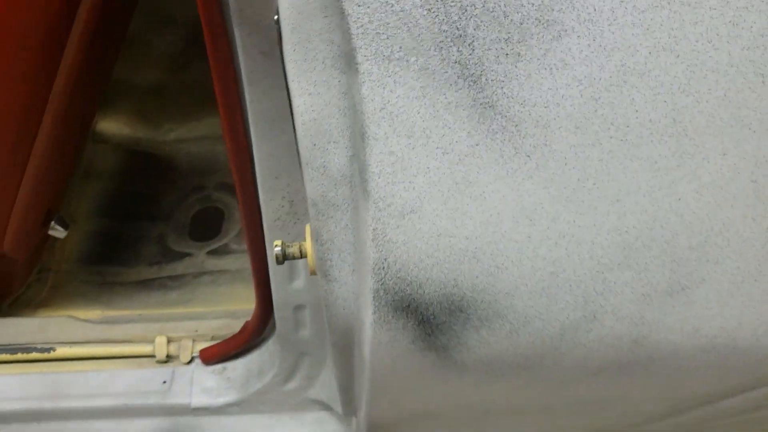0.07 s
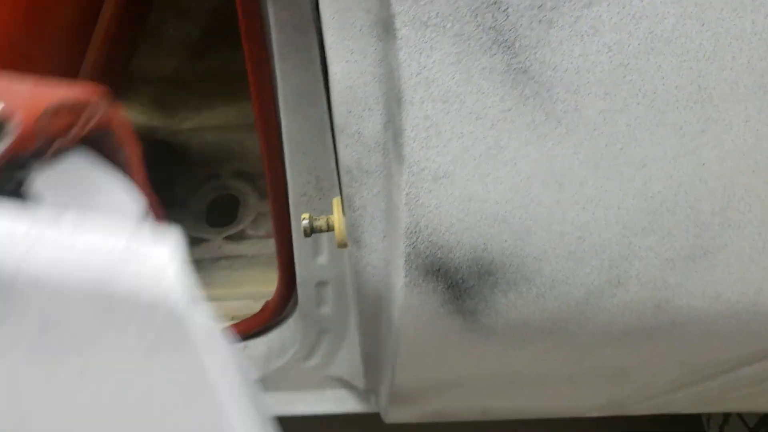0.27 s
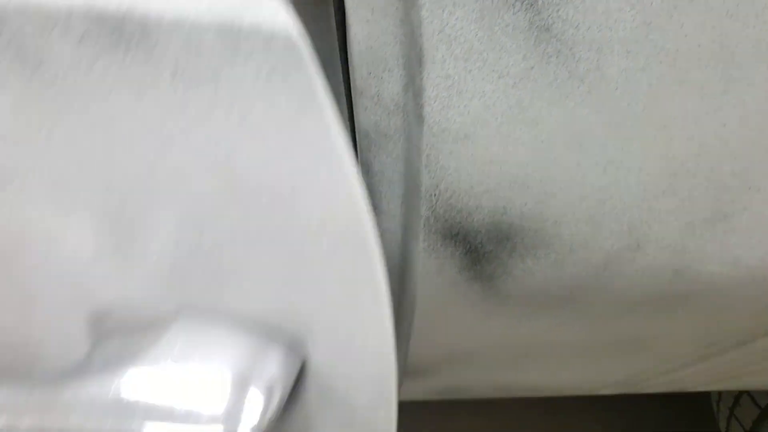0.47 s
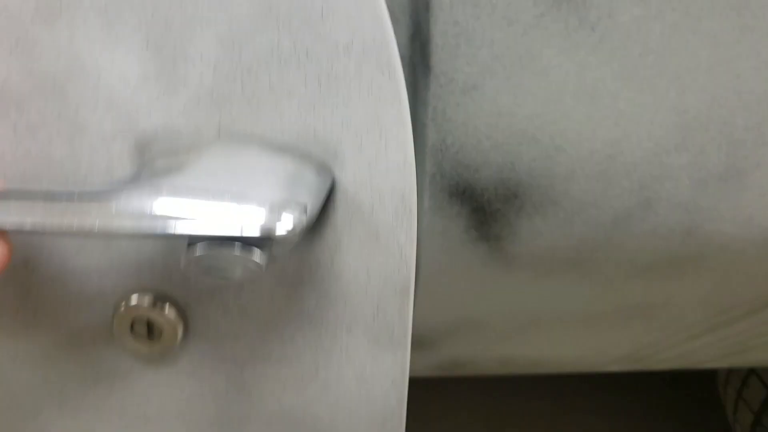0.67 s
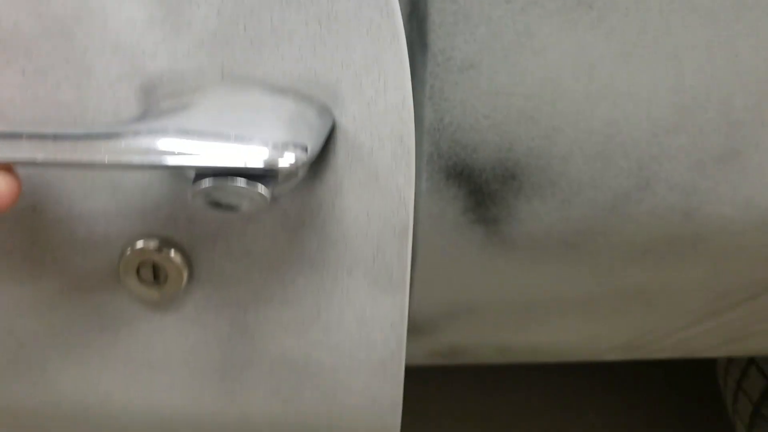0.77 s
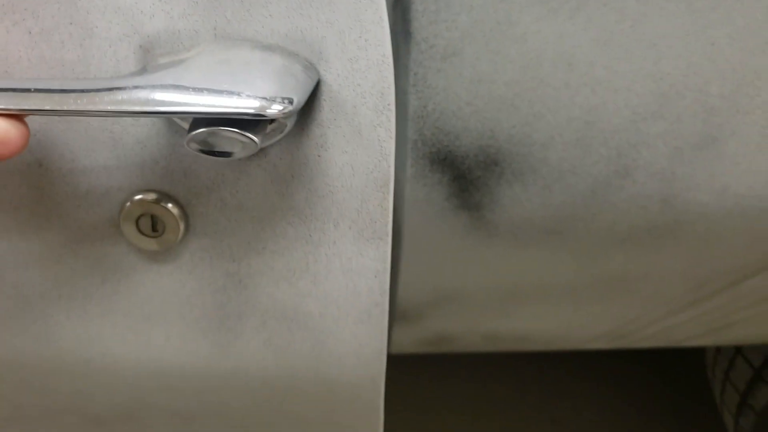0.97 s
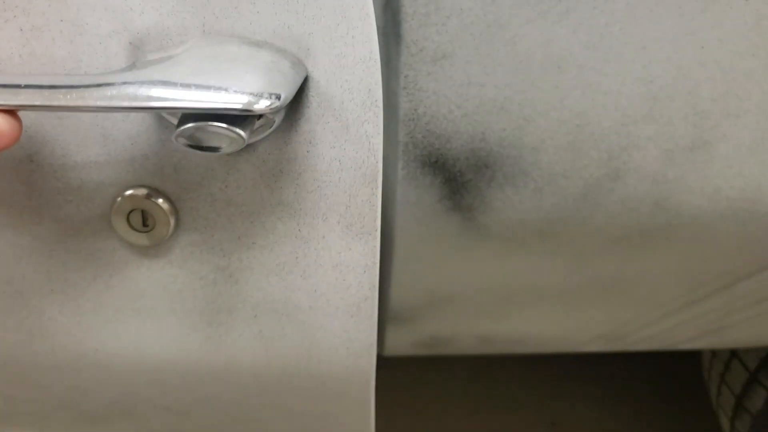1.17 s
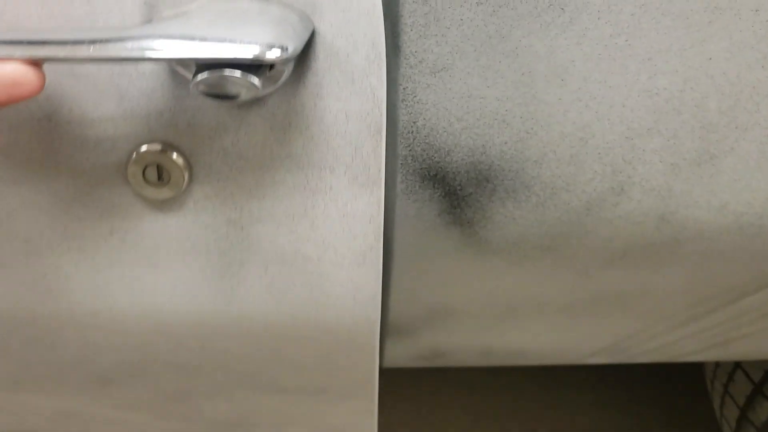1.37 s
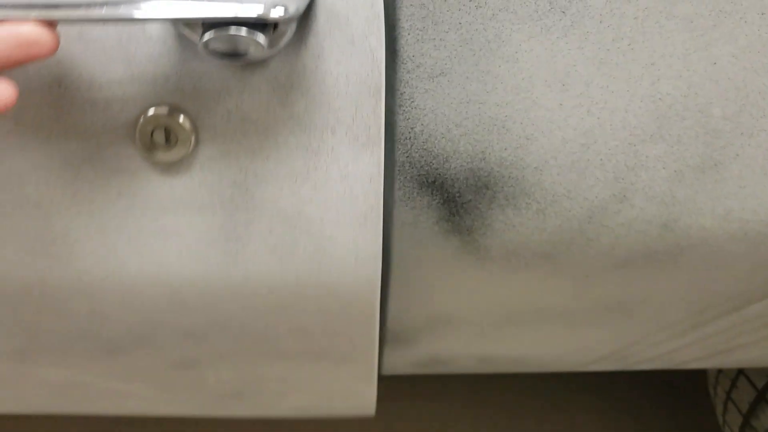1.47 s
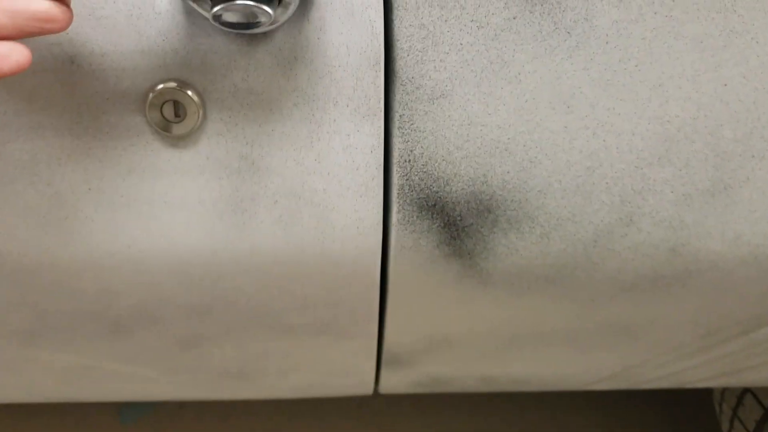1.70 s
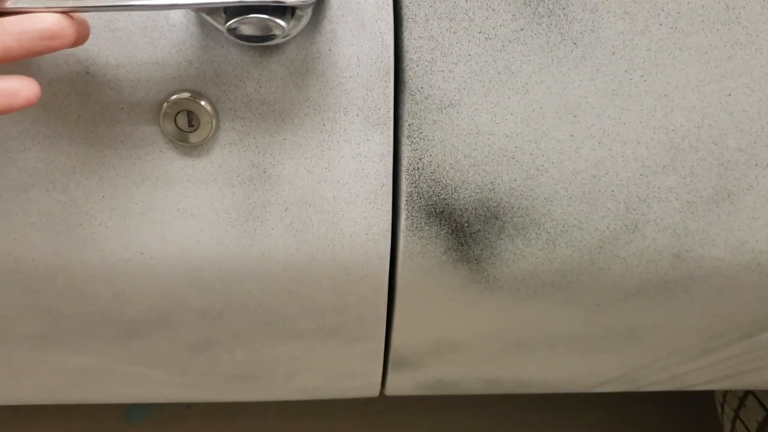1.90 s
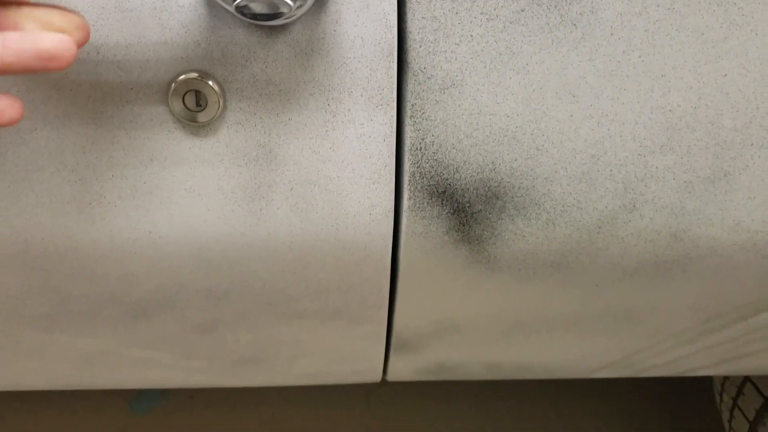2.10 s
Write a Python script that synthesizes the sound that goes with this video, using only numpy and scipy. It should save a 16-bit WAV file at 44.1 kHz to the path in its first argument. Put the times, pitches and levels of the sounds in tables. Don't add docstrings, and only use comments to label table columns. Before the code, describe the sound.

Loud solid slam of an old steel car door, preceded by a quiet scuff and a dull knock, followed by loose metal rattles and an echoing room tail; close hand-held microphone indoors, low background hum.

```python
import sys
import numpy as np
from scipy import signal
from scipy.fft import rfft, irfft
from scipy.io import wavfile
from scipy.ndimage import uniform_filter1d

SR = 44100
rng = np.random.default_rng(int(sys.argv[2]) if len(sys.argv) > 2 else 0)


def nominal_scale(level):
    x = np.asarray(level, float) / 20
    return 10 ** x


def wav_out(sig):
    wavfile.write(sys.argv[1], SR, np.round(np.clip(np.atleast_2d(sig).T, -1, 1) * 32767).astype(np.int16))


N = 94682
TIME = np.arange(N) / SR
LEFT_RIGHT = np.array([[1], [-1]])


def read(table, hz):
    table = np.array(table, float)
    return np.interp(np.log(np.maximum(hz, 1)), np.log(table[:, 0]), table[:, 1])


def unit(x):
    return x / np.sqrt(np.mean(x ** 2))


def colour(x, table, size=4096):
    log_gain = read(table, np.fft.rfftfreq(size, 1 / SR)) * np.log(10) / 20
    cepstrum = irfft(log_gain)
    cepstrum[1:size // 2] *= 2
    cepstrum[size // 2 + 1:] = 0
    response = irfft(np.exp(rfft(cepstrum)))
    response = response / np.sqrt(np.sum(response ** 2))
    return signal.fftconvolve(x, response[None], axes=1)[:, :N]


def lean(x, table):
    half_db = read(table, np.fft.rfftfreq(N, 1 / SR)) / 2
    return irfft(rfft(x) * nominal_scale(half_db * LEFT_RIGHT), N)


# f/Hz, coherence (0-1)
ROOM_LIKE = [(50, 0.97), (150, 0.83), (300, 0.94), (600, 0.56), (1200, 0.023), (4000, 0.0055)]


def pair(size):
    like = read(ROOM_LIKE, np.fft.rfftfreq(size, 1 / SR))
    mid, side = rfft(rng.standard_normal((2, size)))
    return np.sqrt(1 + like) * mid + np.sqrt(1 - like) * side * LEFT_RIGHT


def ring(x, modes, wander=1):
    wander_share, wander_s = 0.03, 0.008
    start = np.argmax(np.abs(x[0]) > 1e-9)
    force = x[:1, start:]
    out = np.zeros((2, N))
    for (hz, db, t60), turn in zip(modes, rng.standard_normal(len(modes))):
        pole = np.exp(2j * np.pi * hz / SR - np.log(1000) / (max(t60, 0.01) * SR))
        drift = unit(uniform_filter1d(rng.standard_normal(N), int(wander_s * SR)))[start:]
        slip = 2 * np.pi * np.cumsum(drift * wander_share * wander * hz) / SR
        slip = slip - slip[np.argmax(np.abs(force))]
        swing = signal.lfilter([1], [1, -pole], force + 0j) * np.exp(1j * slip)
        lead = np.exp(1j * turn * (1 - read(ROOM_LIKE, hz)) * LEFT_RIGHT)
        out[:, start:] += nominal_scale(db) * np.imag(lead * swing)
    return out * 0.028


def grains(per_s, spread_db, alike):
    clicks = (rng.random((3, N)) < per_s / SR) * rng.standard_normal((3, N))
    clicks = clicks * nominal_scale(spread_db * rng.exponential(size=(3, N)))
    return unit(np.sqrt(alike) * clicks[:1] + np.sqrt(1 - alike) * clicks[1:])


def chatter(hits, per_s, rise_s):
    shape = np.zeros(N)
    for at, db, t60 in hits:
        age = np.maximum(TIME - at, 0)
        decay = nominal_scale(db - 60 * age / max(t60, 0.005))
        shape += decay * (1 - np.exp(-age / rise_s))
    return shape * grains(per_s, spread_db=0.8, alike=0.28)


def struck(hits, modes, clatter, clatter_db, per_s, rise_s):
    blows = chatter(hits, per_s, rise_s)
    return ring(blows, modes) + nominal_scale(clatter_db) * colour(blows, clatter)


def pushed(hits, modes, gain_db=0, wander=1):
    push = np.zeros(N)
    for at, db, length_s in hits:
        age = (TIME - at) / length_s
        push += nominal_scale(db) * age * np.exp(-age ** 2) / (length_s * SR)
    return nominal_scale(gain_db + 27.5) * ring(push[None], modes, wander)


def noise_layer(table, db, mask):
    hz = np.fft.rfftfreq(N, 1 / SR)
    return nominal_scale(db) * unit(irfft(pair(N) * nominal_scale(read(table, hz)) * mask, N))


# f/Hz, level/dB per Hz
HUM = [(25, 3), (54, 5.5), (120, -3.5), (195, -14.5), (340, -31), (583, -26), (1000, -36)]
HISS = [(1000, 3), (2000, -30), (2500, -61), (4800, -23), (6040, 2), (8500, -10), (11800, -8.5),
        (16000, -12)]


def room_tone():
    hz = np.fft.rfftfreq(N, 1 / SR)
    hum = noise_layer(HUM, -57.5, (hz < 1000) & (hz > 20))
    return hum + noise_layer(HISS, -76, hz >= 1000)


# f/Hz, T60/s
ROOM_T60 = [(50, 0.05), (200, 1.0), (700, 0.86), (2000, 0.55), (5000, 0.62), (12000, 0.17)]


def room(x, size=65536):
    level_db, delay_s = -3, 0.006
    t = np.arange(size) / SR - delay_s
    hz = np.fft.rfftfreq(size, 1 / SR)
    noise = pair(size)
    tail = 0
    for step in range(20):
        offset = 2 * np.log2(np.maximum(hz, 1) / 25) - step
        share = np.cos(np.pi / 2 * np.clip(offset, -1, 1)) ** 2
        t60 = read(ROOM_T60, 25 * 2 ** (step / 2))
        tail = tail + irfft(noise * share) * nominal_scale(-60 * t / t60) * (t > 0) / np.sqrt(t60 * SR / 7)
    return nominal_scale(level_db) * signal.fftconvolve(x.mean(0)[None], tail, axes=1)[:, :N]


def swayed_room(x):
    sway_turns, sway_s = 0.5, 0.0607
    drift = rng.standard_normal(N)
    for _ in range(2):
        drift = uniform_filter1d(drift, int(sway_s * SR))
    angle = 2 * np.pi * sway_turns * unit(drift)
    return np.cos(angle) * room(x) + np.sin(angle) * room(x)


# t/s, level/dB
SCUFF = [
    (0, -66),
    (.04, -66.5),
    (.085, -65),
    (0.132, -48.5),
    (.22, -44),
    (.27, -47),
    (.36, -59),
    (.42, -66.5),
    (.6, -77.5),
]
# f/Hz, level/dB per Hz
SCUFF_COLOUR = [(100, -4), (250, -1), (800, -9.5), (1500, -6.5), (2700, -7), (6000, -10), (10000, -14),
                (16000, -21)]


def scuff():
    curve = np.array(SCUFF)
    press = nominal_scale(np.interp(TIME, curve[:, 0], curve[:, 1]))
    return colour(press * grains(per_s=14000, spread_db=0.6, alike=0.16), SCUFF_COLOUR)


# f/Hz, level/dB per Hz
SOFT_CLATTER = [(150, -23), (300, 5), (2000, -43)]
# t/s, level/dB, flurry T60/s
CREAK_HITS = [
    (.195, -61, 0.05),
    (.230, -49, 0.044),
    (.265, -46, .1),
]
# f/Hz, level/dB, T60/s
CREAK_MODES = [(160, -15, .06), (232, -18, 0.055), (260, -8, .06), (312, -12, .04), (473, -8, 0.047)]


def creak():
    return struck(CREAK_HITS, CREAK_MODES, SOFT_CLATTER, clatter_db=-25.0, per_s=1700, rise_s=0.0052)


# t/s, level/dB, flurry T60/s
TAP_HITS = [
    (1.01, -68, 0.38),
    (1.045, -66, 0.33),
    (1.062, -62, 0.3),
]
# f/Hz, level/dB, T60/s
TAP_MODES = [(405, -3.5, 0.041), (500, 7.5, 0.086), (683, 0.5, 0.035), (860, -5, .04)]


def taps():
    return struck(TAP_HITS, TAP_MODES, SOFT_CLATTER, clatter_db=-22.0, per_s=3500, rise_s=0.011)


# t/s, level/dB, flurry T60/s
STAY_HITS = [
    (1.2125, -45, 0.34),
    (1.245, -59, 0.21),
]
# f/Hz, level/dB per Hz
STAY_CLATTER = [(200, -26.5), (330, -16.5), (650, -10.5), (900, -9.5), (1500, -13), (3000, -23.5),
                (8000, -34), (16000, -43)]


def stay_clatter():
    return colour(chatter(STAY_HITS, per_s=8800, rise_s=0.0065), STAY_CLATTER)


# t/s, level/dB, flurry T60/s
ROD_HITS = [
    (1.8175, -24.5, 0.146),
    (1.9865, -33.5, 0.14),
    (2.1065, -39.5, 0.13),
]
# f/Hz, level/dB, T60/s
ROD_MODES = [(1480, -4, 0.037), (1642, 3, 0.029), (1820, 7.5, 0.03), (2005, 5, 0.027), (2130, -3.5, 0.023),
             (2290, -4, .015), (3860, -4, .025)]
# f/Hz, level/dB per Hz
ROD_CLATTER = [(2500, -3), (7000, -21), (9000, -22.5), (10500, -13.5), (12000, -6.5), (13500, -21.5),
               (16000, -25.5)]


def lock_rod():
    return struck(ROD_HITS, ROD_MODES, ROD_CLATTER, clatter_db=-11.5, per_s=12000, rise_s=0.0031)


# t/s, level/dB, flurry T60/s
TICK_HITS = [
    (.5, -61.5, 0.045),
    (1.2105, -47, 0.13),
    (1.5765, -32, 0.042),
    (1.6287, -9.5, 0.029),
    (1.6576, -13, 0.022),
]
# f/Hz, level/dB per Hz
TICK_CLATTER = [(1500, -7), (4000, -7), (8000, -3), (10500, -6), (13000, -4.5), (16000, -2)]


def ticks():
    return colour(chatter(TICK_HITS, per_s=17000, rise_s=0.00027), TICK_CLATTER)


# t/s, level/dB, flurry T60/s
LATCH_HITS = [
    (1.552, -70, 0.27),
    (1.561, -51.5, 0.19),
    (1.569, -52, 0.055),
    (1.5752, -15.5, 0.077),
    (1.583, -23.5, 0.11),
]
# f/Hz, level/dB, T60/s
LATCH_MODES = [(290, -8, 0.047), (440.6, -3.5, 0.1), (586, 1, 0.025), (674, 3.5, 0.037), (852, 1, 0.031),
               (1276, 7.5, 0.03), (1566, 3.5, 0.023), (1830, 2.5, 0.019), (2280, -6.5, 0.012),
               (2860, -6.5, 0.074)]
# f/Hz, level/dB per Hz
LATCH_CLATTER = [(100, -48), (250, 1), (700, -0.5), (1500, -2.5), (3000, -8), (6400, -7.5), (9000, -19),
                 (16000, -26.5)]


def latch():
    return struck(LATCH_HITS, LATCH_MODES, LATCH_CLATTER, clatter_db=-4.5, per_s=8000, rise_s=0.0015)


# t/s, level/dB, pulse length/s
SKIN_HITS = [
    (1.615, -26, 0.00052),
    (1.678, -21, 0.00105),
    (1.720, -21, 0.00048),
    (1.762, -25, 0.0013),
    (1.799, -28, 0.00065),
    (1.86, -34.5, 0.0012),
    (2.03, -43.5, 0.0015),
]
# f/Hz, level/dB, T60/s
SKIN_MODES = [(130, -16, 0.25), (150.8, -0.5, 0.31), (163.7, -14, 0.11), (175, 2.5, 0.34), (197.6, 0, 0.32),
              (213.5, -9.5, 0.34), (243, -6.5, 0.49), (310, -13, 0.165), (356, -10, 0.31)]


def door_skin():
    return pushed(SKIN_HITS, SKIN_MODES, gain_db=-0.5, wander=0.25)


# t/s, level/dB, pulse length/s
THUD_HITS = [
    (1.592, -35.5, 0.007),
    (1.640, -24.5, 0.0069),
    (1.673, -17, 0.0037),
]
# f/Hz, level/dB, T60/s
BOOM_MODES = [(48.05, 3, 1.44), (55.2, 0, 1), (64.9, 2.5, 1.33), (73.7, -1.5, 1.5), (79.24, -2, 1.6),
              (86.3, -10, 1.3), (90.2, -7.5, 2.7), (106.2, -8, 2)]


def body_boom():
    return pushed(THUD_HITS, BOOM_MODES, gain_db=-4.5, wander=0)


# t/s, level/dB, flurry T60/s
SLAM_HITS = [
    (1.6287, -16, 0.029),
    (1.633, -19, 0.35),
    (1.6576, -15, 0.074),
    (1.664, -18, 0.037),
]
# f/Hz, level/dB, T60/s
PANEL_MODES = [(367, -13.5, 0.053), (455, 0, 0.056), (566, -2, 0.046), (696.5, -3, 0.12), (790, -7, 0.011),
               (847, -4, 0.035), (1186, -1, 0.018), (1298, -2, 0.034), (1569, -3.5, 0.0366),
               (1722, -1.5, 0.024), (1940, -12, 0.016), (2507, -9, 0.022)]
# f/Hz, level/dB per Hz
SLAM_CLATTER = [(120, -5), (250, -5.5), (760, -0.5), (1700, -5.5), (3500, -5.5), (7000, -13),
                (10000, -15.5), (16000, -20)]


def slam():
    return struck(SLAM_HITS, PANEL_MODES, SLAM_CLATTER, clatter_db=-0.5, per_s=15000, rise_s=0.00076)


# t/s, level/dB, pulse length/s
STAY_KNOCKS = [
    (1.2145, -38.5, 0.0001),
    (1.221, -41, 0.00033),
    (1.234, -44, 0.00023),
    (1.249, -41.5, 0.00021),
    (1.268, -40.5, 0.00042),
    (1.280, -57, 0.00022),
    (1.296, -42.5, 0.00049),
    (1.312, -50.5, 0.00026),
    (1.33, -56.5, 0.00017),
    (1.355, -55.5, .0004),
]
LATCH_KNOCKS = [
    (1.5782, -12.5, 0.000085),
    (1.5915, -19.5, 0.00026),
    (1.601, -25, 0.00029),
    (1.6172, -25.5, 0.00022),
]
SLAM_KNOCKS = [
    (1.6345, -25.5, 0.00025),
    (1.643, -12.5, 0.00025),
    (1.6485, -17.5, 0.00029),
    (1.6592, -3.5, 0.000062),
    (1.6695, -11.5, 0.00011),
    (1.728, -14, .0003),
    (1.737, -23.5, 0.00021),
]
# f/Hz, level/dB, T60/s
STAY_MODES = [(467, -2, 0.103), (498, 4.5, 0.068), (398, -3, 0.038), (790, -1, 0.11), (863, 4, 0.077),
              (1150, -8, 0.086), (1280, -6, 0.079), (2387, -5.5, .06), (240.6, -8.5, 0.4),
              (171.3, -8, 0.26)]


def sharp_knocks():
    stay_knocks = pushed(STAY_KNOCKS, STAY_MODES, wander=0.55)
    latch_knocks = pushed(LATCH_KNOCKS, LATCH_MODES)
    slam_knocks = pushed(SLAM_KNOCKS, PANEL_MODES)
    return stay_knocks + latch_knocks + slam_knocks


# f/Hz, left minus right level/dB
DOOR_BALANCE = [(100, -1), (1000, 0.5), (4000, -0.5), (8000, -6.5), (11000, 5.5), (13000, -13), (16000, 5)]


def door():
    parts = sharp_knocks() + taps() + stay_clatter() + creak() + latch() + slam() + ticks() + lock_rod()
    return lean(parts, DOOR_BALANCE)


def scene():
    near = door() + scuff()
    boom = body_boom()
    skin = door_skin()
    near_room = swayed_room(near)
    low_room = room(nominal_scale(-7) * boom + nominal_scale(-2) * skin)
    return near + boom + skin + near_room + low_room + room_tone()


def low_pass(x):
    return signal.sosfilt(signal.butter(12, 17010, fs=SR, output="sos"), x)


# f/Hz, left minus right level/dB
PORT_BALANCE = [(100, 0), (3000, -1.5), (8000, -6), (13000, -6), (16000, -9.5)]
# f/Hz, level/dB
MIC_COLOUR = [(3000, 0), (4900, -0.5), (6300, 0.5), (7300, -2.5), (8500, -8.5), (10500, -0.5), (12800, 6),
              (16000, 1)]


def record(dry):
    ceiling, bass_cut_hz, top_cut_hz, fade_s = 1.1, 41, 15800, 0.0013
    x = colour(lean(dry, PORT_BALANCE), MIC_COLOUR)
    x = ceiling * np.tanh(x / ceiling)
    x = signal.sosfilt(signal.butter(6, bass_cut_hz, "high", fs=SR, output="sos"), x)
    x = signal.sosfilt(signal.ellip(10, 0.3, 70, top_cut_hz, fs=SR, output="sos"), x)
    x = x * np.clip((N - np.arange(N)) / (fade_s * SR), 0, 1)
    return low_pass(x)


dry = scene()
out = record(dry)
wav_out(out)
```